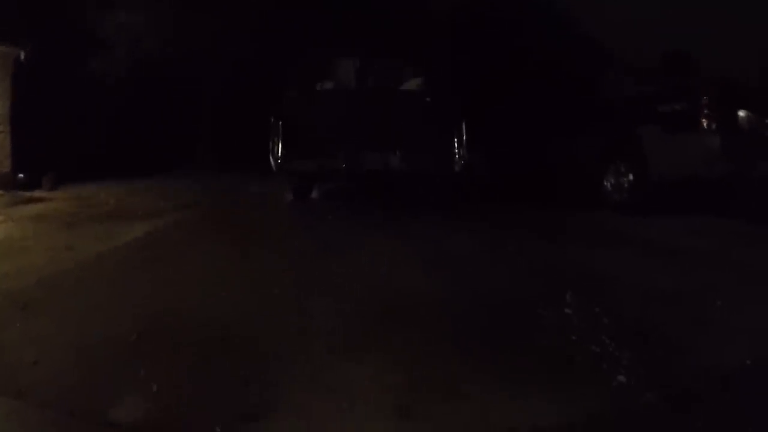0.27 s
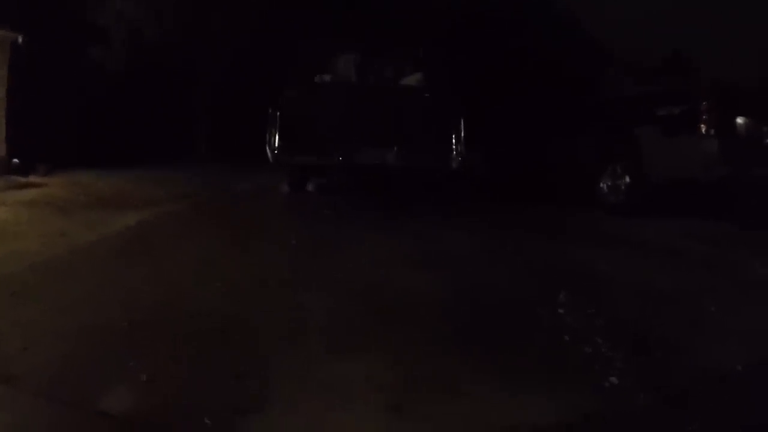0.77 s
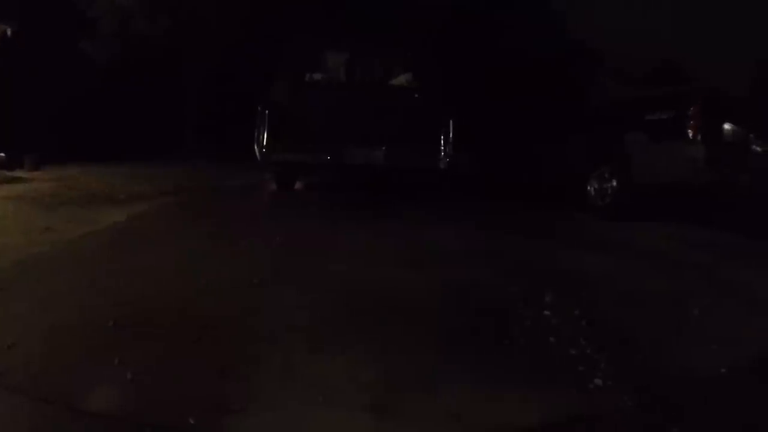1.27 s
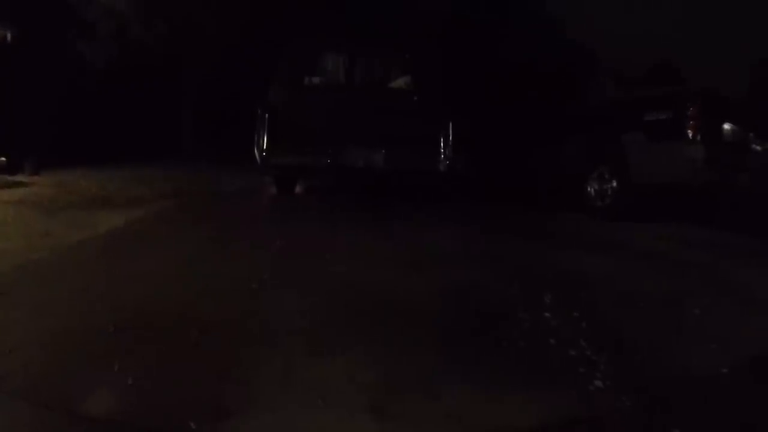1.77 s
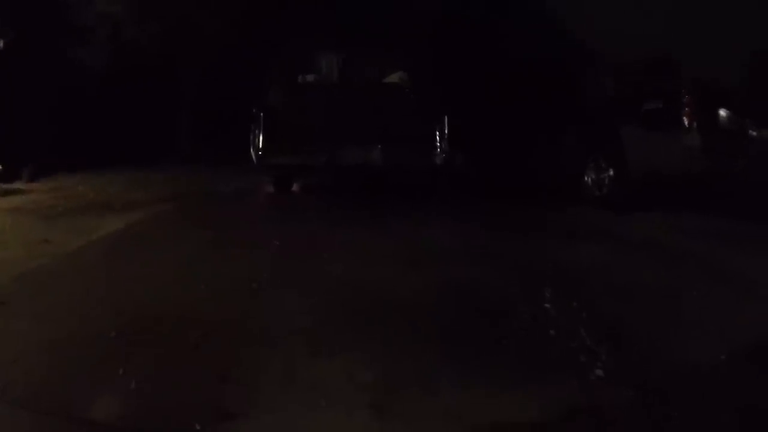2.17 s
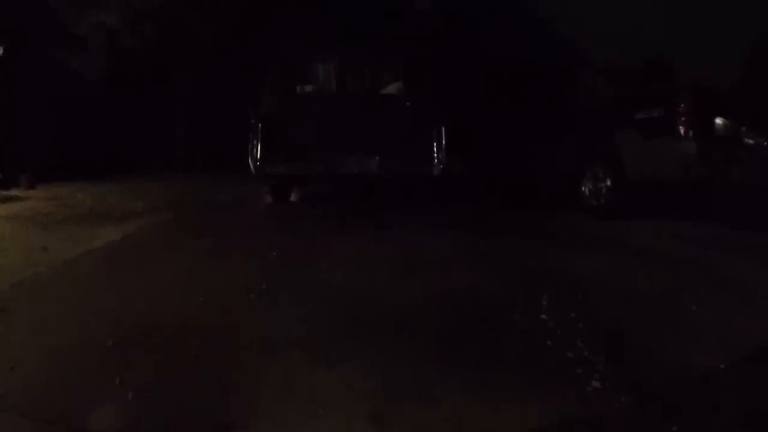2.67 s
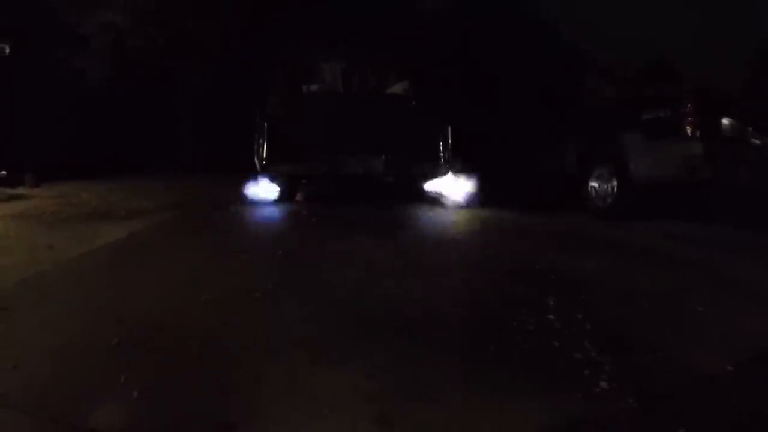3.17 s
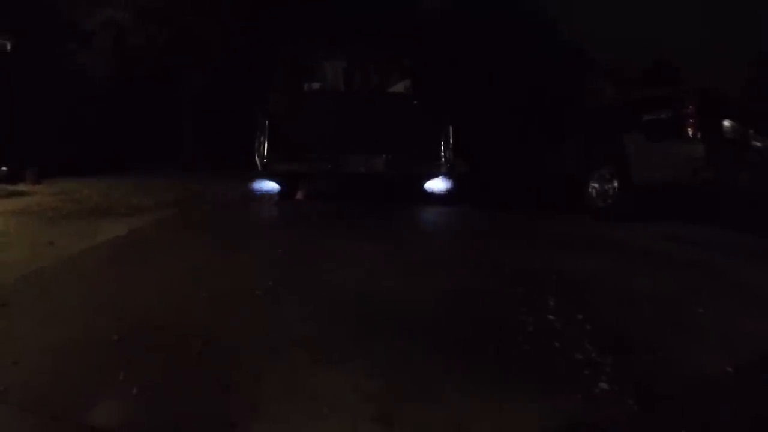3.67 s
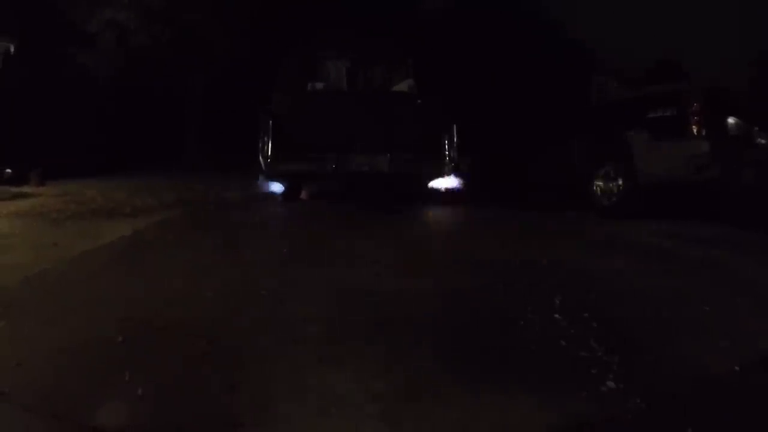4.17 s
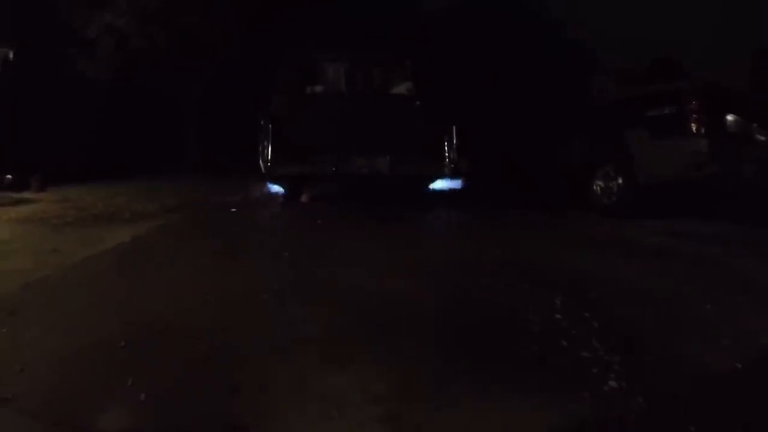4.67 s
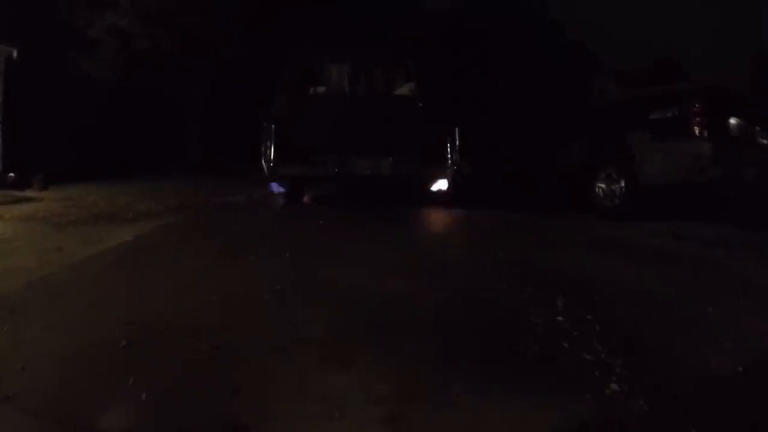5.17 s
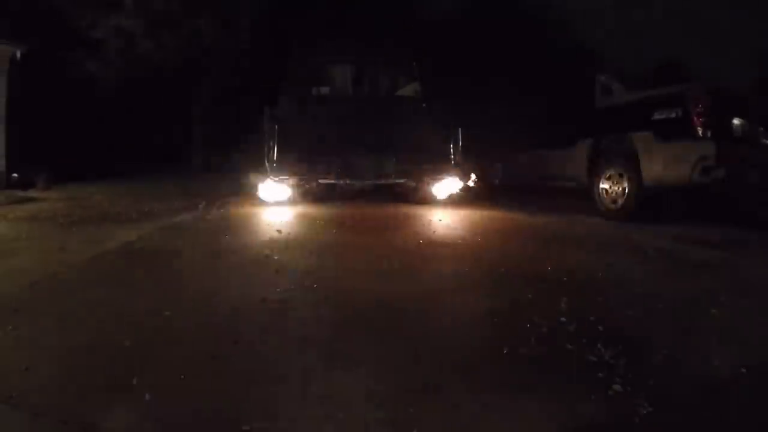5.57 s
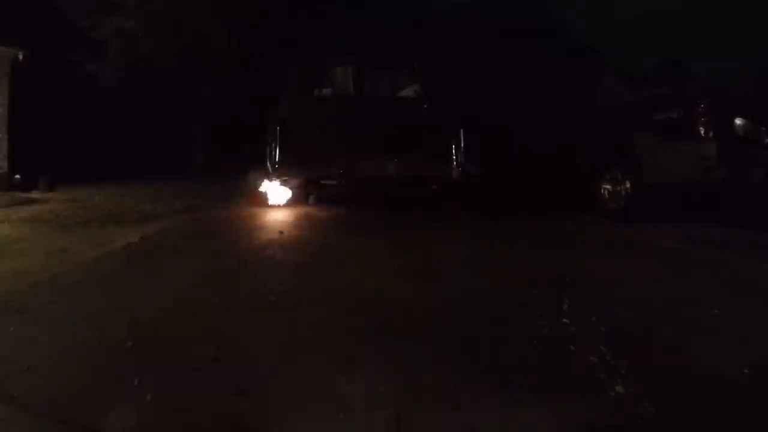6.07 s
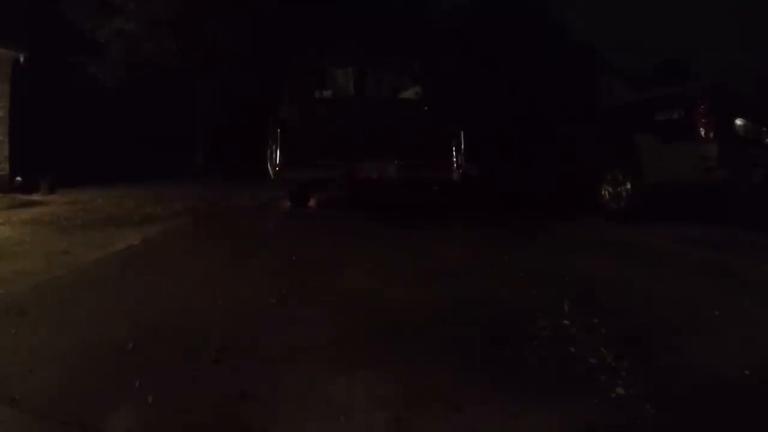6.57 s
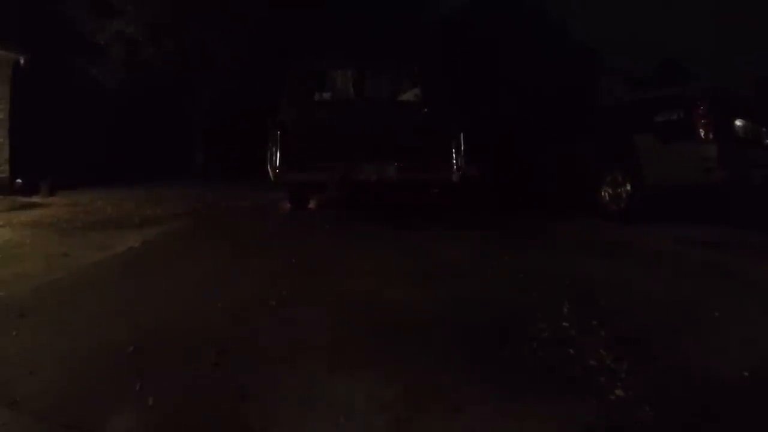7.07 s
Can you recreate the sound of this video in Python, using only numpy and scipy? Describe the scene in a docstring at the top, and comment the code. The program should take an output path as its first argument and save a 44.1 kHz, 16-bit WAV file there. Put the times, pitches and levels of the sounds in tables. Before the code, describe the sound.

A V8 pickup with open twin pipes idles unevenly, spitting, then revs up into a loud, raspy drone. The ignition cuts and fuel burns in the exhaust with deep bangs, a ragged roar, a hollow howl and sharp spits. The engine catches again, sputters and climbs in pitch. It is heard from a few metres behind on a driveway, with short echoes.

```python
"""A V8 truck engine with open twin pipes, revved on a driveway and heard from a few metres behind.
Each firing pushes a puff of gas down a pipe: together the puffs drone, bark and hiss at the pipe tips.
The engine idles unevenly and revs up, its strongest cylinder knocking. Then the ignition is cut and
fuel burns in the pipes with bangs, a roar, a howl and spits. The engine catches again and climbs.
Loose metal ticks under load, and the ground, truck and house send back short echoes."""
import sys
import numpy as np
from scipy import signal
from scipy.fft import rfft, irfft, next_fast_len
from scipy.io import wavfile
from scipy.ndimage import uniform_filter1d

SR = 44100
rng = np.random.default_rng(int(sys.argv[2]) if len(sys.argv) > 2 else 0)


def generate_wav(signal):
    """Clip the signal to [-1, 1] and save it as 16-bit WAV at the path in sys.argv[1]."""
    frames = np.transpose(np.atleast_2d(signal))
    scaled = np.clip(frames, -1, 1) * 32767
    pcm = np.round(scaled).astype(np.int16)
    wavfile.write(sys.argv[1], SR, pcm)


N = 323253
TIME = np.arange(N) / SR
CYLINDERS = 8
THROTTLE_SHUT_S, IGNITION_CUT_S, CATCH_S = 2.795, 3.19, 5.38
IDLE_RATE, SPUTTER_RATE, SMOOTH_RATE = 45, 64, 95  # engine speeds, in firings per second

# Levels in the tables are relative: the functions add their own gains.
# a faint high hiss that swells while the flames burn: t/s, level/dB
HIGH_HISS = [(3.3, -61.5), (4.1, -57.5), (4.75, -46), (4.95, -66)]
# echoes from ground, truck and house: delay/s, level/dB
ECHOES = [(.0013, -18.5), (.0047, -43), (0.013, -13.5), (0.029, -12), (0.046, -11.5), (0.077, -13.5)]
# loose metal ticking on the exhaust: t/s, level/dB, f/Hz
TICKS = [(2.308, -25, 4550), (2.368, -30, 4640), (2.507, -32, 4650), (2.546, -34, 4650), (2.589, -31, 4700),
         (2.674, -31, 4600), (2.697, -30, 4650), (2.735, -27, 4670), (2.808, -32, 4790), (6.334, -24, 2677),
         (6.431, -25, 2604), (6.986, -25, 2536), (7.001, -23.5, 2460), (7.028, -26, 2770)]
# the flame howling in the mouth of the pipe: t/s, f/Hz, level/dB
HOWL = [(3.25, 450, -40), (3.495, 450, -36), (3.515, 435, -18.5), (3.61, 450, -23.5), (3.699, 350, -20.5),
        (3.848, 360, -32.5), (4.032, 420, -28), (4.3, 460, -51), (4.532, 460, -63), (4.63, 490, -22),
        (4.731, 430, -44), (4.811, 485, -27), (5, 460, -41), (5.2, 450, -46)]
# how strongly the fuel burns in the pipes: t/s, level/dB
FLAME = [(3.25, -26), (3.495, -27), (3.512, -21), (3.67, -24.5), (3.75, -28), (3.85, -32), (4.3, -33),
         (4.36, -36), (4.568, -37.5), (4.59, -24), (4.64, -23), (4.88, -21), (5.061, -27.5), (5.161, -40),
         (5.38, -36)]
# tone colour of the flame's deep rumble: f/Hz, level/dB
RUMBLE_COLOUR = [(13, -34), (22, 0), (43, 2.5), (80, 5.5), (113, 5), (182, 1.5), (230, -4), (300, -50),
                 (510, -120)]
# tone colour of the flame's roar: f/Hz, level/dB
ROAR_COLOUR = [(120, -22.5), (210, 2), (249, -7), (285, 4), (318, -2), (436, -1), (540, -7.5), (650, -12.5),
               (745, -29), (832, -20.5), (1280, -34.5), (1600, -32), (2080, -83), (3520, -120)]
# bangs in the pipes, and sharp knocks of the strongest cylinder firing under load: t/s, level/dB, f/Hz
BANGS_AND_KNOCKS = [(0.952, -10, 420), (1.083, -10, 440), (2.329, -10, 680), (2.366, -26, 820),
                    (2.439, -20, 850), (2.508, -23, 900), (2.572, -23, 900), (2.636, -18, 900),
                    (2.697, -12.5, 900), (2.717, -1, 175), (2.753, -3.5, 186), (3.216, 6, 109),
                    (3.511, 1, 110.5), (3.563, -6, 129.6), (3.601, -6, 122), (3.626, -3, 160),
                    (3.656, -1, 149), (3.685, -14, 388), (3.842, -10, 165), (3.908, -13, 109.5),
                    (3.963, -11.5, 120), (4.016, -18, 138), (4.202, -19, 141), (4.285, -16, 120),
                    (4.643, -0.5, 70.4), (4.764, -10, 175), (4.797, -0.5, 128), (4.88, -3, 113),
                    (4.936, -3, 94), (5.439, -15, 700), (5.524, -11.5, 636), (5.612, -11, 118),
                    (5.671, -2.5, 139)]
# ringing notes of the pipe tips before they heat up: f/Hz, width/Hz, level/dB
TIP_NOTES = [(860, 110, 1.5), (1590, 16, -3.5), (1790, 61, 4), (2170, 91, -1), (2525, 58, 8),
             (2700, 66, 2.5), (3750, 110, -7), (4660, 190, -8)]
# hot gas raises those notes: t/s, pitch ratio
TIP_TUNING = [(2.2, 1), (2.8, 1.04), (5.2, 1.1), (5.65, 1.085), (6.3, 1.035)]
# tone colour of gas hissing from the tips: f/Hz, level/dB
TIP_COLOUR = [(760, -56.5), (1300, -14.5), (1580, 0), (1700, -3), (2290, -4), (2590, 1), (3060, -5),
              (3680, -2.5), (4250, -5), (4660, -3), (4960, -4.5), (6420, -8.5), (8830, -24.5),
              (11400, -25.5), (15200, -46)]
# spits of unburnt fuel, at idle, in the flames and as the engine catches: t/s, level/dB, f/Hz
FUEL_SPITS = [(0.0024, -18, 3180), (0.0533, -19, 5650), (0.0742, -17, 4660), (0.1171, -18.5, 3380),
              (0.1421, -14, 3140), (0.1955, -15, 3700), (0.2354, -17, 4650), (0.2648, -21.5, 5170),
              (0.3057, -18, 6210), (0.3311, -15.5, 4504), (0.3744, -16.5, 3750), (0.4264, -21, 5330),
              (0.5122, -15.5, 3700), (0.5591, -16.5, 5460), (0.6045, -18, 6160), (0.6804, -20, 5255),
              (0.6978, -16, 3653), (0.7457, -16, 4660), (0.7916, -14, 6330), (0.8144, -16, 4735),
              (0.8629, -15, 4606), (0.8864, -15, 3370), (0.9188, -12.5, 3750), (0.9592, -14, 3770),
              (0.9744, -12.5, 4740), (1.0091, -14, 3720), (1.062, -16.5, 3387), (2.7524, -21, 4050),
              (3.5418, -29.5, 3800), (3.6027, -30.5, 2950), (3.6252, -37, 5130), (3.6554, -39, 3690),
              (3.684, -31, 3900), (3.7564, -41, 3730), (4.2882, -41, 3140), (4.5734, -19, 2930),
              (4.6364, -25, 3700), (4.6683, -21, 3460), (4.6934, -22.5, 3730), (4.7224, -22.5, 3750),
              (4.7845, -19.5, 3700), (4.811, -18.5, 3640), (4.8374, -25.5, 4130), (4.8673, -20, 3120),
              (4.8918, -21, 3640), (4.9177, -17.5, 3340), (4.9437, -19.5, 3750), (5.0244, -18.5, 3410),
              (5.1088, -34, 3370), (5.2714, -27, 3750), (5.3492, -32, 3540), (5.3857, -18, 3240),
              (5.4126, -20, 4135), (5.4415, -22, 3910), (5.4984, -20, 3570), (5.5263, -17, 3700),
              (5.5702, -22, 4840), (5.5942, -13.5, 4650), (5.6146, -16, 3210), (5.6366, -16, 4080),
              (5.6714, -18.5, 3584), (5.695, -17.5, 3260), (5.7294, -18, 4800), (5.7473, -17, 3833),
              (5.7778, -17.5, 4775), (5.8107, -19, 4700), (5.8551, -17.5, 4200), (5.8726, -12.5, 4800)]
# hollow notes of the tips, heard as a dull chuff under each spit: f/Hz, width/Hz, level/dB
CHUFF_NOTES = [(700, 160, -4), (860, 170, 1), (1536, 97, 3), (1850, 180, -2.5)]
# how hard each cylinder spits, in firing order: level/dB
CYLINDER_SPIT_DB = [0.5, -11, 6, 4.5, -10.5, 2.5, 6, -4.5]
# borders of the bands of hiss that make up the rasp: f/Hz
RASP_EDGES = [600, 1400, 2200, 3100, 4200, 5500, 7500, 20000]
# engine speed up to the ignition cut: t/s, rate/(firings per s)
FIRST_SPEED = [(0, 43.2), (.8, 43.2), (.94, 48.6), (1.05, 60), (1.17, 80), (1.3, 91), (1.48, 98.5),
               (1.7, 101.4), (2.24, 101), (2.32, 104), (2.52, 121), (2.66, 130.5), (2.8, 147.5),
               (3.19, 101)]
# engine speed after it catches again: t/s, rate/(firings per s)
SECOND_SPEED = [(5.38, 33.3), (5.49, 37), (5.67, 49.5), (5.9, 68.4), (6.23, 85), (6.4, 91), (6.82, 102),
                (7.2, 135), (7.33, 141.6)]
# load (how hard the engine works) up to the ignition cut: t/s, level/dB
FIRST_LOAD = [(0, -29.5), (.68, -28), (.94, -24.5), (1.06, -25.5), (1.55, -35.5), (1.9, -35.5),
              (2.42, -30.5), (2.66, -34.5), (2.76, -25), (2.79, -35.5), (2.85, -39), (3.19, -40.5)]
# load after it catches again: t/s, level/dB
SECOND_LOAD = [(5.38, -33), (5.5, -26.5), (5.6, -23.5), (5.8, -28.5), (6.15, -33), (6.5, -32.5),
               (6.92, -29.5), (7.33, -33)]
# stumbles of the idle: t/s, length/s
STUMBLES = [(0.458, 0.045), (0.633, 0.02)]
# the engine's tones under load, at 1/8, 2/8, 3/8 ... of the firing rate: level/dB
TONE_DB = [-52, -33, -33, -23, -7, -18, -11, 0, -21, -22, 0, -12, -11, -11, -7, -5, -19, -26, -7, -24, -27,
           -20, -21, -19, -25, -25, -20, -26, -27, -22, -27, -18, -25, -25, -22, -29]
# tones that change at idle: multiple of the firing rate, change/dB
IDLE_TONES = [(.625, -9), (.875, -8), (1, 2), (1.375, -7), (1.5, -3), (1.75, -8), (1.875, -10), (2, 4),
              (2.375, 5), (3, 5), (3.25, 6), (4, -6)]
# tones of air pumped with the throttle shut: multiple of the firing rate, level/dB
COAST_TONES = [(.375, -7), (.625, -14), (1.375, -7), (1.625, -15), (2, -15)]
# how well the mufflers let the tones through: f/Hz, level/dB
MUFFLER = [(25, -15), (42, 5.5), (140, -0.5), (184, 0), (203, 3), (224, -5.5), (241, 0.5), (262, -7.5),
           (288, 7.5), (320, 0), (350, 2), (404, 1), (462, 5), (600, -8)]
# the drone's three ranges (boom, body, overtones), split where they meet: low f/Hz, high f/Hz
RANGES = [(30, 72), (72, 160), (160, 300)]
# the drone at each speed: rate/(firings per s), boom/dB, body/dB, overtones/dB
DRONE_BY_SPEED = [(34, -13.5, -33, -16), (40.3, -15.5, -17, -28.5), (53, -9, -15.5, -26.5),
                  (59.8, -10, -17.5, -33), (74.4, -48, -15.5, -27), (90.7, -20.5, -14, -23),
                  (105.6, -31, -14.5, -12.5), (120, -35, -14, -16), (136, -43, -12.5, -16.5)]
# the drone with the throttle shut: boom/dB, body/dB, overtones/dB
DRONE_COAST_DB = [-25, -22.5, -24]
# the share of each range that goes to the clean tones: boom/dB, body/dB, overtones/dB
CLEAN_SHARE_DB = [-2, -0.74, -0.5]
# strength of each cylinder, in firing order: level/dB
CYLINDER_DB = [0, -5, 2.5, -3, -4, -6, 4, -2.5]
# the pipe each cylinder breathes through, in firing order: 1 = longer, 0 = shorter
LONG_PIPE = [1, 0, 0, 1, 0, 1, 1, 0]
# tone colour of the exhaust pipes: f/Hz, level/dB
PIPE_COLOUR = [(22, -10.5), (50, -9.5), (100, 1), (200, 6.5), (340, 5), (460, 3.5), (540, -6.5), (630, -2),
               (730, -8.5), (860, -3), (1000, -15.5), (1200, -17), (1380, -37.5), (2500, -46.5)]


def from_db(db):
    """Turn decibels into a gain."""
    return 10 ** (np.asarray(db) / 20)


def rms_one(x):
    """Scale a sound to an average (rms) level of one."""
    return x / np.sqrt(np.mean(x ** 2) + 1e-20)


def running_rms(x, size=5000):
    """The level over about a tenth of a second."""
    return np.sqrt(np.abs(uniform_filter1d(uniform_filter1d(x ** 2, size), size // 2)) + 1e-14)


def in_time(rows):
    """Join a table's points into one curve over time for each column."""
    s, *columns = np.transpose(rows)
    return [np.interp(TIME, s, column) for column in columns]


def during(start, end, fade=0.0066):
    """One between two times, fading to zero outside them."""
    return np.clip(1 + np.minimum(TIME - start, end - TIME) / fade, 0, 1)


def drift(per_s):
    """A random wobble, about one in size."""
    points = rng.standard_normal(4000)
    return rms_one(np.interp(TIME * per_s, np.arange(len(points)), points))


def band(x, low_hz, high_hz):
    """Keep what lies between two frequencies."""
    return signal.sosfilt(signal.butter(2, [low_hz, high_hz], "band", fs=SR, output="sos"), x)


def lows(x, hz, order):
    """Keep what lies below a frequency, without delaying it."""
    return signal.sosfiltfilt(signal.butter(order, hz, fs=SR, output="sos"), x)


def coloured(x, colour):
    """Give a sound a tone colour from a table."""
    size = 2 * next_fast_len(N // 2 + SR // 4)
    hz, db = np.transpose(colour)
    freq = np.maximum(np.fft.rfftfreq(size, 1 / SR), 1)
    gain = from_db(np.interp(np.log(freq), np.log(hz), db))
    # fold the filter so that it rings only after a sound, never before (minimum phase)
    cepstrum = irfft(np.log(gain))
    cepstrum[1:size // 2] *= 2
    cepstrum[size // 2 + 1:] = 0
    return irfft(rfft(x, size) * np.exp(rfft(cepstrum)))[:N]


def resonance(x, hz, width_hz):
    """Ring at one note; the narrower it is, the longer it rings."""
    r = np.exp(-np.pi * width_hz / SR)
    feedback = [1, -2 * r * np.cos(2 * np.pi * hz / SR), r * r]
    return signal.lfilter(np.array([1, 0, -1]) * (1 - r * r) / 2, feedback, x + 1e-18)


def add(out, s, sound):
    """Mix a sound in, starting at s seconds."""
    start = max(int(s * SR), 0)
    out[start:start + len(sound)] += sound[:max(N - start, 0)]


def background_hiss(steady_db=-76):
    """A very faint steady hiss, and a higher one that swells and fades."""
    steady = from_db(steady_db) * rms_one(band(rng.standard_normal(N), 300, 14000))
    high = from_db(in_time(HIGH_HISS)[0] - 14) * rms_one(band(rng.standard_normal(N), 6000, 14000))
    return steady + high


def driveway(x, tail_db=-15, tail_s=0.76):
    """Nearby surfaces add dull echoes, and trees scatter a faint tail."""
    out, dulled = x.copy(), band(x, 27, 4200)
    for delay, db in ECHOES:
        add(out, delay, from_db(db) * dulled)
    age = TIME[:SR // 2]
    tail = rng.standard_normal(len(age)) * from_db(-60 * age / tail_s) * (age > .012)
    return out + from_db(tail_db) * signal.fftconvolve(x, tail / np.linalg.norm(tail))[:N]


def metal_ticks(ring_s=0.0066):
    """Loose metal rings briefly on a pair of close notes."""
    out, age = np.zeros(N), TIME[:SR // 15]
    for s, db, hz in TICKS:
        notes = sum(np.sin(2 * np.pi * hz * detune * age) for detune in rng.uniform(.985, 1.015, 2)) / 2
        add(out, s, from_db(db) * notes * np.exp(-age / ring_s))
    return out


def pipe_echo(x, reflection, trips_per_s=57.6):
    """Sound runs up and down the exhaust, losing most of its strength on each trip."""
    out, lag = x.copy(), int(SR / trips_per_s)
    for i in range(lag, N, lag):
        out[i:i + lag] += reflection * out[i - lag:i][:N - i]
    return out


def flame_howl(flutter_per_s=42, gain_db=-1.5):
    """The flame feeds a hollow, fluttering note whose pitch moves with the heat of the gas."""
    hz, db = in_time(HOWL)
    phase = 2 * np.pi * np.cumsum(hz) / SR
    tone = drift(flutter_per_s) * np.cos(phase) + drift(flutter_per_s) * np.sin(phase)
    return from_db(db + gain_db) * tone * during(HOWL[0][0], HOWL[-1][0])


def flame_roar(flame_db, pops_per_s=160, pop_spread_db=3):
    """Fuel burns raggedly: many small pops over a smooth rush sound the pipe's own notes."""
    out = np.zeros(N)
    rumble_db = -19.5 + 0.6 * (flame_db - np.mean(FLAME, axis=0)[1])  # swings less than the roar
    for db, colour in ((rumble_db, RUMBLE_COLOUR), (flame_db + 2.5, ROAR_COLOUR)):
        popping = rng.random(N) < pops_per_s / SR
        pops = popping * from_db(pop_spread_db * np.clip(rng.standard_normal(N), -2, 2))
        gas = rms_one(pops - pops.mean()) + 0.73 * rng.standard_normal(N)
        burn = coloured(pipe_echo(gas, reflection=0.22), colour)
        out += from_db(db) * burn / running_rms(burn)
    return out * during(FLAME[0][0] - .02, FLAME[-1][0])


def bangs_and_knocks(crest_cycles=0.64, width_cycles=0.31, steepness=2.57, crack_db=-42, gain_db=-0.5):
    """Pipe bangs and cylinder knocks: a push, a deep suck and a rebound, with torn gas and a crack."""
    out, age = np.zeros(N), TIME[:SR // 10]
    for s, db, hz in BANGS_AND_KNOCKS:
        swell = np.exp(-((hz * age - crest_cycles) / width_cycles) ** 2)
        swing = np.tanh(steepness * np.sin(2 * np.pi * hz * age))
        torn = rms_one(band(rng.standard_normal(len(age)), 267, 485)) * np.exp(-age / 0.008)
        crack = from_db(crack_db + db) * band(rng.standard_normal(len(age)), 700, 15000) * swell ** 4
        add(out, s, from_db(db + gain_db) * (swell * swing + 0.37 * torn + crack))
    return out


def pipe_tips(x, ring_share=0.6, wander=.008, ground_echo_s=.001905, ground_echo_db=-17.5):
    """The pipe ends colour the gas noise and ring higher when hot; the ground adds a short echo."""
    # ringing on a faster clock raises all the notes together
    clock = np.cumsum(in_time(TIP_TUNING)[0] * (1 + wander * drift(20)))
    steps = np.arange(int(clock[-1]))
    stretched = np.interp(steps, clock, x)
    ringing = sum(from_db(db) * resonance(stretched, hz, width) for hz, width, db in TIP_NOTES)
    sound = coloured(x + ring_share * np.interp(clock, steps, ringing), TIP_COLOUR)
    return sound + from_db(ground_echo_db) * np.roll(sound, int(ground_echo_s * SR))


def spits(rows, attack_s, hold_s, release_s, chuff_db, gain_db, ragged_db=2.5, chuff_spread_db=4.5):
    """Hard puffs of torn gas, each hissing around its own pitch, with a dull chuff beneath."""
    out, chuffs, age = np.zeros(N), np.zeros(N), TIME[:SR // 20]
    envelope = np.minimum(age / attack_s, 1) * np.exp(-np.maximum(age - attack_s - hold_s, 0) / release_s)
    gas = np.pad(pipe_tips(rng.standard_normal(N)), (0, len(age)), "wrap")
    for s, db, hz in rows:
        shreds = np.interp(np.linspace(0, 39, len(age)), np.arange(40), rng.uniform(-1, 1, 40))
        flow = envelope * from_db(ragged_db * shreds)
        hiss = flow * gas[int(s * SR):][:len(age)]
        whistle = sum(resonance(hiss, note, width_hz=450) for note in (hz, hz * rng.uniform(0.38, 0.95)))
        strength = from_db(db + gain_db) * np.sqrt(np.mean(envelope ** 2))
        add(out, s, strength * rms_one(hiss + 2.9 * whistle))
        add(chuffs, s, strength * rms_one(flow * rng.standard_normal(len(age))))
    for hz, width, db in CHUFF_NOTES:
        chance_db = chuff_spread_db * np.tanh(drift(40))  # each chuff favours other notes
        out += from_db(chuff_db + db + chance_db) * resonance(chuffs, hz, width)
    return out


def idle_share(rate):
    """One at idle, where burns are slow and uneven; zero once the engine runs smoothly."""
    return np.clip((SMOOTH_RATE - rate) / (SMOOTH_RATE - IDLE_RATE), 0, 1)


def coasting():
    """One while the throttle is shut and the engine only pumps air."""
    return during(THROTTLE_SHUT_S, CATCH_S - .3, fade=.04)


def firing_count(rate, at_start=.4, at_catch=5.85):
    """Count up by one for each firing, starting afresh when the engine catches."""
    count = np.cumsum(rate) / SR
    restarted = count - count[int(CATCH_S * SR)] + at_catch
    return np.where(TIME < (IGNITION_CUT_S + CATCH_S) / 2, count + at_start, restarted)


def cylinder_at(count):
    """Which cylinder the nearest firing belongs to."""
    return np.round(count).astype(int) % CYLINDERS


def firing_clicks(count, strength_db, scatter_db):
    """One click per firing, as strong as its cylinder, give or take a random scatter."""
    at = np.flatnonzero(np.diff(np.floor(count)) > 0)
    chance_db = scatter_db * np.clip(rng.standard_normal(2000)[:len(at)], -1.5, 1.5)
    clicks = np.zeros(N)
    clicks[at] = from_db(np.array(strength_db)[cylinder_at(count[at])] + chance_db)
    return clicks


def puffs(clicks, decay_s):
    """Each click opens a flow of gas that swells and dies away."""
    r = np.exp(-1 / (decay_s * SR))
    flow = signal.lfilter([1], [1, -2 * r, r * r], clicks + 1e-18)
    return flow / running_rms(flow)


def cylinder_spits(count, rate, load_db, centre_hz=3700, spread_octaves=0.79):
    """Once the engine pulls, each firing spits at a random pitch, the same cylinders always hardest."""
    pulling = (rate > SPUTTER_RATE) & ((TIME < THROTTLE_SHUT_S) | (TIME > CATCH_S))
    at = np.flatnonzero((np.diff(np.floor(count)) > 0) & pulling[1:])
    db = load_db[at] + np.array(CYLINDER_SPIT_DB)[cylinder_at(count[at])]
    hz = centre_hz * 2 ** (spread_octaves * rng.uniform(-0.83, 1, len(at)))
    rows = zip(TIME[at], db, hz)
    return spits(rows, attack_s=0.00088, hold_s=0.004, release_s=0.0047, chuff_db=-0.5, gain_db=-7.5)


def exhaust_rasp(count, level_db, steady=0.56, scatter_db=6, brightening=0.65, gain_db=-5.5):
    """Every puff tears into hiss at the tips, each cylinder with its own mix of low and high."""
    calm = 0.71 * coasting()  # a shut throttle evens out the hiss
    shared_wobble, out = drift(60), np.zeros(N)
    for low_hz, high_hz in zip(RASP_EDGES, RASP_EDGES[1:]):
        strength_db = .5 * np.array(CYLINDER_SPIT_DB) + 2 * np.tanh(rng.standard_normal(CYLINDERS))
        clicks = firing_clicks(count, strength_db, scatter_db=0)
        wobble_db = scatter_db * (1 - calm) * np.tanh(shared_wobble + drift(90))
        flow = uniform_filter1d(puffs(clicks * from_db(wobble_db), decay_s=0.0027), size=120)
        hiss = (steady + calm + (1 - calm) * flow) * band(rng.standard_normal(N), low_hz, high_hz)
        if high_hz == RASP_EDGES[-1]:  # faster gas is brighter
            hiss *= from_db(brightening * (level_db - np.median(level_db)))
        out += hiss
    return from_db(level_db + gain_db) * rms_one(pipe_tips(out))


def pumped_air(count, waver_db=2.86):
    """With the throttle shut the engine only pumps air: a few tones and a soft rush."""
    phase = 2 * np.pi * count
    tones = sum(from_db(db + waver_db * drift(45)) * np.cos(times * phase) for times, db in COAST_TONES)
    rush = 0.11 * rms_one(band(rng.standard_normal(N), 200, 480))
    return tones - np.cos(phase) + rush


def firing_tones(count, rate, waver_db=2.5, idle_waver_db=1.5, rise_db_per_octave=9.5):
    """Unequal cylinders repeat every eight firings, making tones in eighths of the firing rate."""
    idling, out = idle_share(rate), np.zeros(N)
    cylinder_phases = np.angle(np.fft.fft(from_db(CYLINDER_DB)))
    for k, db in enumerate(TONE_DB, 1):
        multiple = k / CYLINDERS
        phase = cylinder_phases[k % CYLINDERS] + .9 * rng.standard_normal()
        idle_db = dict(IDLE_TONES).get(multiple, 0) - 2.5 * (k % CYLINDERS > 0)
        level_db = db + idling * idle_db + (waver_db + idle_waver_db * idling) * drift(10)
        if multiple == 1:  # the tone at the firing rate takes over at high speed
            level_db += rise_db_per_octave * np.maximum(np.log2(rate / SMOOTH_RATE), 0)
        out += from_db(level_db) * np.cos(2 * np.pi * multiple * count + phase)
    return out


def engine_drone(count, rate):
    """The low tones pass the mufflers; boom, body and overtones follow the speed and the throttle."""
    shut = during(THROTTLE_SHUT_S, FLAME[0][0])
    tones = coloured((1 - shut) * firing_tones(count, rate) + shut * pumped_air(count), MUFFLER)
    boom = lows(tones, RANGES[0][1], order=4)
    body = lows(tones - boom, RANGES[1][1], order=4)
    speeds, *pulling_db = np.transpose(DRONE_BY_SPEED)
    coast, out = coasting(), np.zeros(N)
    for i, part in enumerate((boom, body, tones - boom - body)):
        db = (1 - coast) * np.interp(rate, speeds, pulling_db[i]) + coast * DRONE_COAST_DB[i]
        out += from_db(db + CLEAN_SHARE_DB[i]) * part / running_rms(part)
    return out


def engine_bark(count, rate, load_db, pipe_lag_s=.0013, swirl=1.45, db_per_octave=8.5, gain_db=-3):
    """Each firing sends a pulse and swirling gas down a pipe, louder with load and speed."""
    late = np.array(LONG_PIPE)[cylinder_at(count)] * pipe_lag_s * rate
    clicks, idling = firing_clicks(count - late, CYLINDER_DB, scatter_db=1.5), idle_share(rate)
    # at idle, slow valves give soft pulses and puffs that run together
    pulses = from_db(-10.5 * idling) * clicks / running_rms(clicks)
    flow = (1 - idling) * puffs(clicks, decay_s=0.0024) + idling * puffs(np.sqrt(clicks), decay_s=0.0063)
    eddies = flow * rng.standard_normal(N)
    eddies -= 0.29 * (1 - idling) * lows(eddies, 500, order=2)  # large swirls fade at speed
    gas = band(swirl * eddies - pulses, 40, 4100)
    sound = coloured(pipe_echo(gas, reflection=0.13), PIPE_COLOUR)
    level_db = load_db + db_per_octave * np.log2(rate / IDLE_RATE) - 4 * coasting()
    # the mufflers store pressure, so the bark swells over a few firings
    pressure = uniform_filter1d(from_db(level_db), size=1200)
    return pressure * from_db(gain_db + 7 * idling) * sound / running_rms(band(sound, 244, 1200))


def scene(stumble_db=-19.5, flame_hiss_db=-21):
    """Speed and load play the engine; between the ignition cut and the catch the flame takes over."""
    rate = in_time(list(FIRST_SPEED) + list(SECOND_SPEED))[0]
    count, flame_db = firing_count(rate), in_time(FLAME)[0]
    running = during(0, IGNITION_CUT_S, fade=0.15) + during(CATCH_S, TIME[-1], fade=0.11)
    stumbling = sum(during(s, s + length_s, fade=0.021) for s, length_s in STUMBLES)
    load_db = in_time(list(FIRST_LOAD) + list(SECOND_LOAD))[0] + stumble_db * stumbling
    rasp_db = running * (load_db - 1.5 * idle_share(rate)) + (1 - running) * (flame_db + flame_hiss_db)
    exhaust = spits(FUEL_SPITS, attack_s=0.0018, hold_s=0.0078, release_s=0.0044, chuff_db=1, gain_db=-9.5)
    exhaust += cylinder_spits(count, rate, load_db)
    exhaust += running * engine_bark(count, rate, load_db) + exhaust_rasp(count, rasp_db)
    exhaust += bangs_and_knocks() + metal_ticks()
    mix = background_hiss() + driveway(exhaust) + running * engine_drone(count, rate)
    return (mix + flame_roar(flame_db) + flame_howl())[None]


def record(dry, cutoff_hz=15450, fade_s=.004):
    """Flatten the loudest swings, fade out the very end and cut the highest treble."""
    limited = .97 * dry / (1 + np.abs(dry) ** 8) ** (1 / 8)
    faded = limited * np.clip((TIME[-1] - TIME) / fade_s, 0, 1)
    return signal.sosfilt(signal.ellip(10, .2, 80, cutoff_hz, fs=SR, output="sos"), faded)


dry = scene()
out = record(dry)
generate_wav(out)
```